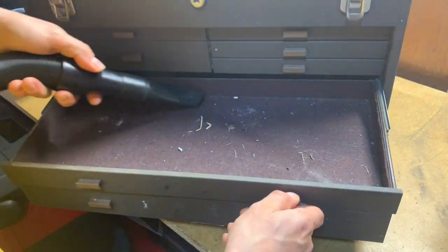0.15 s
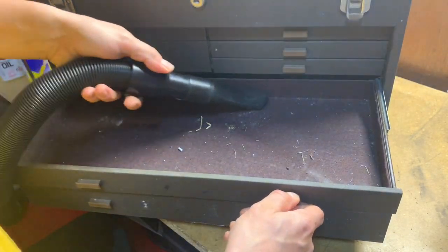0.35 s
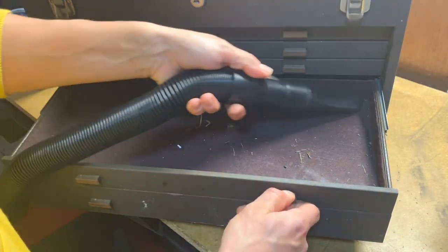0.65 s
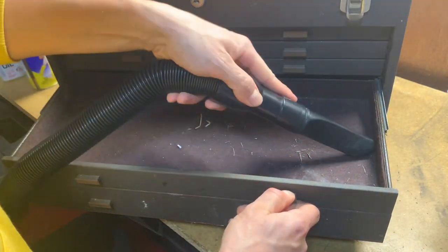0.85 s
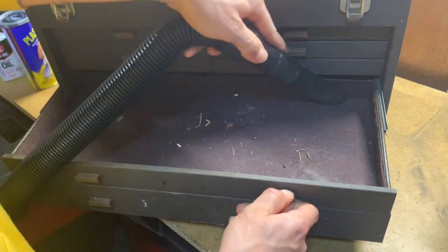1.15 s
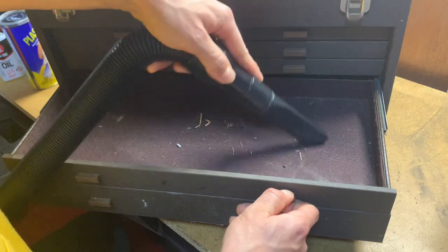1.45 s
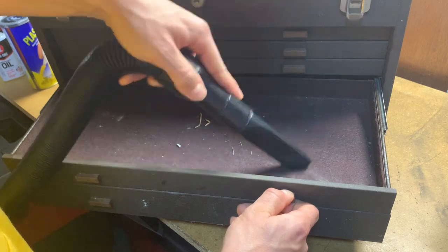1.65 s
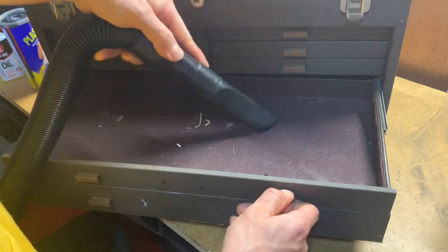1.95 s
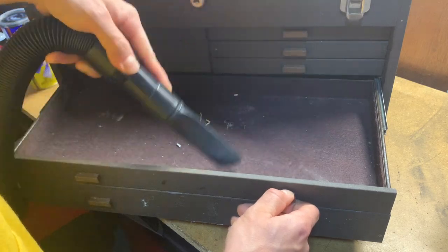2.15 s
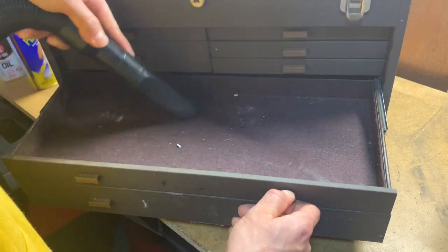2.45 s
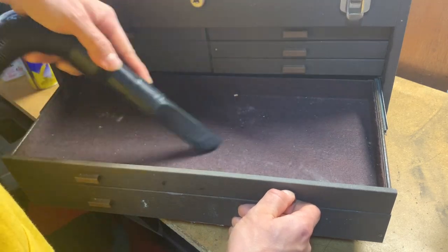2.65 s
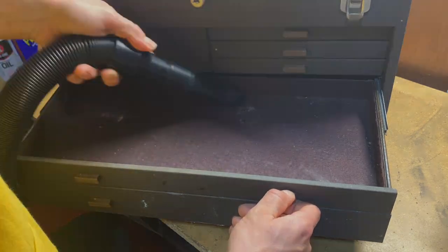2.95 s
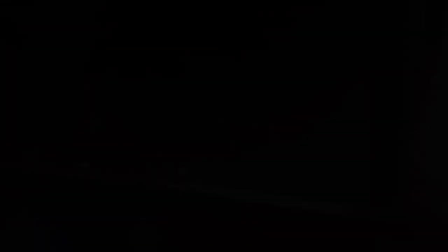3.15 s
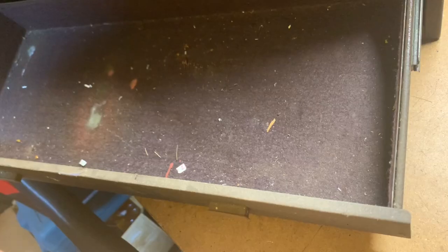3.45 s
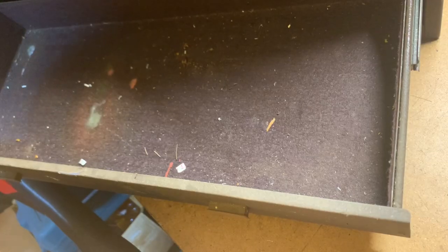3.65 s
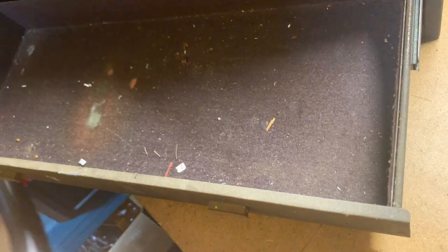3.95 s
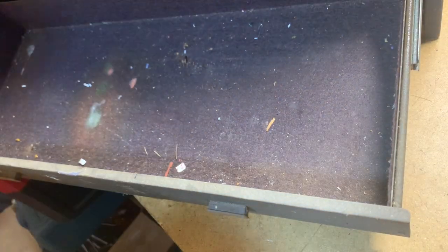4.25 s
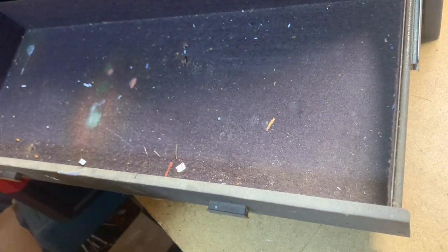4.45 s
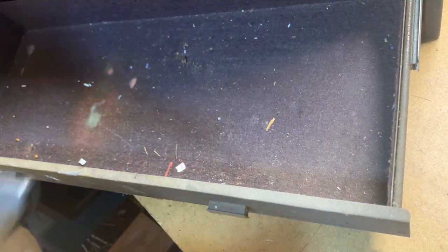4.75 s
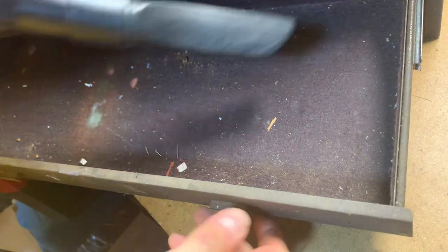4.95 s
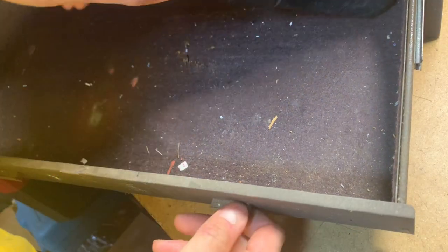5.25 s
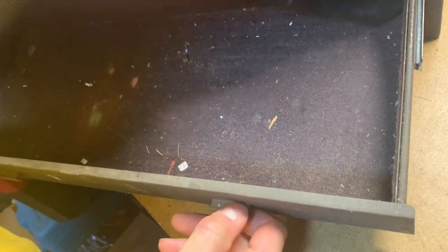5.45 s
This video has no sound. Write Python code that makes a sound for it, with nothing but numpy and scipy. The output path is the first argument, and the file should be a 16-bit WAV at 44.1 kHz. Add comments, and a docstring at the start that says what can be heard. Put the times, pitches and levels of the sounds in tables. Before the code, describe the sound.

A vacuum cleaner runs throughout, heard close in stereo in a workshop: a strong, nearly pure whine around 820 Hz, a faint, much higher fan whistle, low hose rumble and broad nozzle hiss. From 0 to 0.7 s the hiss swells and roars along the drawer's back wall. At about 0.75 s the nozzle presses onto felt; the rumble chokes briefly, the motor rises slightly, and hiss flutters in short puffs. Faint squeals come around 1.1-1.8 s. Small thuds and clacks run from 0.8 to 2.25 s, sharpest near 1.8, with another at 2.9. Suction opens after 2 s. At 3.2 s everything dips to silence for an instant, then resumes a shade lower, with fuller air roar over a second drawer. Around 4.2-4.8 s the hovering nozzle sounds hollow and tubular. A wall rush rises from 4.9 s; at 5.4 s the mouth seals, pitch jumps slightly, and rapid rasps sweep upward to the end.

```python
"""Vacuuming a tool box drawer

A vacuum cleaner whines (sine tones) in a workshop while its crevice nozzle sweeps the felt of a steel drawer.
Air rumbles in the hose and hisses at the nozzle (coloured noise). Pressed on the felt, the nozzle chokes,
the motor speeds up and the hiss swells briefly; at the back wall it roars; it bumps the drawer (ringing modes).
At 3.2 s the sound dips briefly and goes on over a second drawer, where the nozzle hovers and its tube rings."""
import sys
import numpy as np
from scipy import signal
from scipy.fft import rfft, irfft, next_fast_len
from scipy.io import wavfile
from scipy.ndimage import uniform_filter1d, map_coordinates

SR = 44100
rng = np.random.default_rng(int(sys.argv[2]) if len(sys.argv) > 2 else 0)


def waveform_to_disk(signal):
    """Save audio, clipped to [-1, 1], as 16-bit WAV at the path in sys.argv[1]."""
    frames = np.transpose(np.atleast_2d(signal))
    scaled = np.clip(frames, -1, 1) * 32767
    samples = np.round(scaled).astype(np.int16)
    wavfile.write(sys.argv[1], SR, samples)


N = 247401
T = np.arange(N) / SR  # time of each sample, s
DIP_S = 3.206  # middle of the dip between the drawers
TOP_HZ = 15750  # no sound above this
LEAVE_S = 0.036  # time to leave the back wall

# how the nozzle meets the felt: t/s, open tube ringing (0-1), mouth pressed shut (0-1)
CONTACT = [(0, 0, 0), (.68, 0.04, 0.33), (.75, 0, 0.9), (1.7, 0, 0.86), (2, 0, 0), (3.15, 0, 0.02),
           (3.3, 0.03, 0.2), (3.7, 0.07, 0.06), (4, 0, 0.5), (4.3, 0.06, 0.1), (4.48, 0.16, 0.02),
           (4.8, 0.1, 0), (4.92, 0, 0.13), (5.05, 0, 0.05), (5.36, 0.02, 0.08), (5.385, 0, 0.98),
           (5.6, 0, 0.6)]
# the nozzle runs along the back wall: start/s, end/s, closeness (0-1), approach/s
WALL_PASSES = [(-.3, .72, 0.96, 0.68), (2.87, 3.11, 0.48, 0.16), (4.95, 5.385, 0.7, 0.15)]
# whistle of the fan blades: t/s, level/dB
BLADE_TONE = [(0, -51.5), (.8, -49.5), (1.6, -50), (2.05, -53), (2.35, -53.5), (2.5, -62), (3.15, -53.5),
              (3.4, -56), (4.15, -53), (4.32, -60), (4.5, -55), (4.85, -58), (4.93, -68), (5.35, -60),
              (5.5, -54)]


def amp(db):
    """Turn decibels into gain."""
    return 10 ** (np.asarray(db) / 20)


def unit(x):
    """Scale to rms 1."""
    return x / np.sqrt(np.mean(x ** 2) + 1e-20)


def along(points, hz):
    """Read a curve of (f/Hz, value) points, joined on a log frequency axis."""
    f, v = np.transpose(points)
    return np.interp(np.log(hz + 1), np.log(f + 1), v)


def curves(rows):
    """Give one value per sample for each column after the time."""
    s, *columns = np.transpose(rows)
    return [np.interp(T, s, column) for column in columns]


def spells(rows, release_s):
    """Add up an attack, hold and release for each (start, end, strength, attack) row."""
    total = 0
    for start, end, strength, attack_s in rows:
        rise, fall = (T - start) / attack_s, (end - T) / release_s
        total = total + strength * np.clip(np.minimum(rise, fall), 0, 1)
    return total


def wobble(rate):
    """Make a smooth random curve with rate random points a second."""
    coarse = T[::16]
    knots = rng.standard_normal(int(N * rate / SR) + 4)
    return np.interp(T, coarse, map_coordinates(knots, [coarse * rate]))


def filtered(x, response):
    """Multiply the spectrum of x by a response of frequency."""
    m = next_fast_len(N + 8192)
    return irfft(rfft(x, m) * response(np.fft.rfftfreq(m, 1 / SR)), m)[..., :N]


def noise(response, channels=1):
    """Make independent noises of one colour, rms 1 together."""
    return unit(filtered(rng.standard_normal((channels, N)), response))


def above(hz, edge_hz, order=20):
    """Gain of a high-pass, steeper with higher order."""
    return np.sqrt(1 - 1 / (1 + (hz / edge_hz) ** order))


def below(hz, edge_hz, order=20):
    """Gain of a low-pass, steeper with higher order."""
    return np.sqrt(1 / (1 + (hz / edge_hz) ** order))


def resonance(hz, centre_hz, width_hz):
    """Gain of one resonance, half at width_hz from its centre."""
    return 1 / (1 + ((hz - centre_hz) / width_hz) ** 2)


def per_drawer(first, second):
    """Use one value or sound before the middle of the dip, another after it."""
    return np.where(T < DIP_S, first, second)


def blend(a, b, share):
    """Cross-fade two noises at constant power; share is the part of b."""
    return np.sqrt(1 - share) * a + np.sqrt(share) * b


def steady(x):
    """Hold the rms of several channels near 1 over time."""
    power = uniform_filter1d(np.mean(x ** 2, axis=0), size=3000)
    return x / np.sqrt(abs(power) + 1e-20)


def sliding(x, pitch):
    """Play noise channels at a moving relative pitch."""
    place = np.cumsum(pitch) % (N - 1)
    return np.array([map_coordinates(channel, [place], order=3, mode="mirror") for channel in x])


def delayed(x, ms):
    """Let x arrive later by a moving delay."""
    return map_coordinates(x, [np.arange(N) - ms * SR / 1000], order=4, mode="mirror")


def tone(phase, db, pan_db, lead):
    """Make a stereo sine of given rms; the left side leads by lead radians."""
    sides = np.array([[.5], [-.5]])
    return np.sqrt(2) * amp(db + sides * pan_db) * np.sin(phase + sides * lead)


def motor():
    """Rotor imbalance sings at the shaft rate; the fan blades whistle far above and squeal when starved of air."""
    # motor speed: t/s, shaft f/Hz
    speed = [(0.06, 818.9), (0.69, 818.0), (0.78, 822.8), (0.86, 820.2), (0.99, 819.7), (1.16, 826.4),
             (1.3, 825.6), (1.4, 823.0), (1.47, 825.2), (1.68, 826.1), (1.77, 825.4), (1.84, 821.7),
             (2.23, 818.6), (2.38, 823.0), (2.89, 820.9), (3.15, 818.4), (3.28, 811.0), (4.08, 810.6),
             (5.37, 812.6), (5.44, 821), (5.5, 823.2), (5.6, 820.5)]
    # shaft tone at the microphones: t/s, level/dB, left-right/dB
    shaft_tone = [(.06, -33, -0.5), (.27, -34, .4), (.5, -32.4, -0.5), (.85, -32.5, .8), (1.2, -33, 2),
                  (2.2, -32, 1.2), (3.15, -32, 1), (3.25, -32.5, 6), (3.92, -32, 4.5), (4.22, -35.5, 5),
                  (4.45, -35.5, 5), (4.95, -36.5, 4.5), (5.33, -35.5, 4), (5.46, -34.5, 4.5)]
    # the choked fan squeals: start/s, end/s, strength (0-1), attack/s
    squeals = [(1.115, 1.37, 1, 0.03), (1.42, 1.8, 0.87, 0.039)]
    blades = 7
    shaft_hz, = curves(speed)
    shaft_db, pan_db = curves(shaft_tone)
    blade_db, = curves(BLADE_TONE)
    # the octave of the blade tone is softer, but a squeal lifts it
    octave_db = blade_db - 8.5 + 8.5 * spells(squeals, release_s=0.031)
    turn = 2 * np.pi * np.cumsum(shaft_hz * (1 + 0.00012 * wobble(45))) / SR

    whine = tone(turn, shaft_db + 0.046 * wobble(35), pan_db, per_drawer(0.64, 0.47))
    whine += tone(2 * turn, per_drawer(-66.5, -59.5) + 2 * wobble(33), 1.9, 1.0)
    # the third harmonic sounds at the second drawer only
    whine += per_drawer(0, tone(3 * turn, -64 + 2 * wobble(15), 0.59, 0.34))
    # turbulence at the blades makes their tones flutter
    whine += tone(blades * turn, blade_db + 0.92 * wobble(16) + wobble(90), 6.4, 0.98)
    whine += tone(2 * blades * turn, octave_db + 2.0 * wobble(14) + wobble(90), 3.2, 0.43)
    return whine


def fan_hiss():
    """Turbulence between the blades smears part of the whistle into a narrow hiss."""
    centre_hz, width_hz = 5830, 190
    blade_db, = curves(BLADE_TONE)
    shared, *own = noise(lambda hz: resonance(hz, centre_hz, width_hz), channels=3)
    against_tone_db = per_drawer(-11, 1.5)
    return blend(shared, np.array(own), share=0.26) * amp(blade_db + against_tone_db + wobble(8.8))


def air():
    """The air stream rumbles in hose and canister, nearly alike at both microphones; a closed mouth muffles it."""
    # colour of the rumble at each drawer: f/Hz, level/dB
    first_air = [(25, -51), (45, -29), (80, -17), (135, -10), (210, -9), (320, -2), (430, 0.5), (530, -7),
                 (620, 2), (750, 13.5), (950, 9.5), (1080, 13), (1190, 9), (1330, -24), (1700, -94)]
    second_air = [(25, -57), (45, -47), (80, -22), (135, -11), (210, -11), (350, 3), (440, -4.5),
                  (540, 0.5), (620, -1), (730, 13), (900, 4.5), (1000, 6), (1200, -2.5), (1370, -33),
                  (1700, -41)]
    # stereo width of the rumble: f/Hz, side against mid/dB
    air_side = [(30, -6), (80, -16), (300, -15.5), (700, -11.5), (1200, -3)]
    # low body, then upper body: first drawer/dB, second drawer/dB, mouth shut/dB, back wall/dB
    rumble = [(-58.5, -53.5, 0, 1), (-47.5, -51, -5.5, 1)]
    # air roar just under the whine: t/s, level/dB
    roar_level = [(0, -56), (.68, -55), (.78, -58.5), (1.7, -55), (2.18, -49.5), (2.45, -54), (3.19, -53),
                  (3.22, -46), (3.95, -42.5), (4.3, -48.5), (4.85, -49), (5.33, -49.5), (5.42, -63)]
    # the lip seals for a moment and the rumble drops: start/s, end/s, depth (0-1), closing/s
    seals = [(.7, .81, 0.5, 0.027), (5.36, 5.7, 0.43, 0.017)]

    def part(colour, band):
        """One band of the rumble as left and right."""
        mid, side = noise(lambda hz: amp(along(colour, hz)) * band(hz), channels=2)
        side = filtered(side, lambda hz: amp(along(air_side, hz)))
        return np.array([mid + side, mid - side])

    _, shut = np.clip(curves(CONTACT), 0, 1)
    roar_db, = curves(roar_level)
    wall, sealed = spells(WALL_PASSES, LEAVE_S), spells(seals, release_s=0.025)
    low_db, high_db = [per_drawer(first_db, second_db) + shut_db * shut + wall_db * wall
                       for first_db, second_db, shut_db, wall_db in rumble]
    bands = (lambda hz: below(hz, 480),
             lambda hz: above(hz, 480) * below(hz, 800),
             lambda hz: above(hz, 860))
    low, roar, high = [per_drawer(part(first_air, band), part(second_air, band)) for band in bands]
    low = low * amp(low_db - 9 * sealed + 1.4 * wobble(19))
    high = high * amp(high_db - 15 * sealed + 1.3 * wobble(15))
    return low + roar * amp(roar_db) + high * amp([[1.8], [-1.8]])  # upper body leans left


def tube(hz):
    """The open nozzle is a tube of air with several resonances."""
    # tube resonances: f/Hz, width/Hz, level/dB
    tube_modes = [(1670, 174, -0.5), (2760, 120, -4.5), (3960, 310, -7.5), (5640, 230, -20),
                  (7570, 230, -15), (9050, 360, -10.5), (10760, 240, -14), (13000, 200, -19),
                  (14600, 400, -33)]
    return np.sqrt(sum((amp(db) * resonance(hz, centre, width)) ** 2 for centre, width, db in tube_modes))


def suction():
    """Turbulence at the nozzle mouth, stronger with more flow: one direct sound and two scattered by the steel box."""
    # colours of the hiss over each drawer, pressed on the felt, and in the wall's corner: f/Hz, level/dB
    first_drawer = [(1300, 4), (1500, 0.5), (1900, -5.5), (2500, -3.5), (3100, -0.5), (3700, 0),
                    (4500, 3.5), (5200, -2.5), (6300, -0.5), (7300, -4), (9200, -2), (10600, 0.5),
                    (13000, 6.5), (14800, 8)]
    second_drawer = [(1300, 5.5), (1550, 6.5), (2000, -1), (2450, -2.5), (3050, -2), (3600, -1.5),
                     (4900, -7.5), (5700, -8.5), (6800, -13), (7700, -5), (8400, -10), (9300, -3.5),
                     (10600, -8.5), (12200, 1), (13400, 2), (14800, 3)]
    pressed_felt = [(1300, -13), (1600, -3.5), (1850, -8), (2150, 2), (2600, 6), (3000, 4.5), (3650, 9.5),
                    (4700, 1.5), (5800, 1.5), (7300, 3), (9000, 4.5), (11200, -0.5), (12200, 5.5),
                    (13200, 5), (15500, 0)]
    wall_corner = [(1400, -6), (1650, -14), (2000, -4), (2300, -0.5), (2700, 1.5), (3150, -1.5),
                   (3700, 3.5), (4500, 3.5), (5200, -6.5), (6200, -2.5), (7000, -1.5), (9000, -1.5),
                   (12000, -2), (15000, -5.5)]
    # the tube resonances slide as the mouth nears the felt and lifts: t/s, pitch over the usual
    tube_pitch = [(3.3, 1.1), (4.1, 1.01), (4.4, 1.01), (4.6, 1.02), (4.85, 1.015), (5.1, 0.98)]
    # air speed at the mouth: t/s, flow/dB
    air_flow = [(0, -2), (.68, -4.5), (.715, 1.5), (.82, -1), (1.0, -5.5), (1.12, -9), (1.68, -9.5),
                (1.92, -3), (2.15, -2.5), (2.58, -4), (2.78, -2), (3.15, -4), (3.7, -4.5), (3.87, -0.5),
                (4.03, -1.5), (4.28, -4.5), (4.55, 0.5), (4.8, -1), (4.95, -4), (5.1, -8), (5.3, -5.5),
                (5.46, -1)]
    # lower edges of the noise bands: f/Hz
    band_edges = [1250, 2200, 5200, 10000]
    # bands from the drawer hollow up to the fizz: first drawer/dB, second drawer/dB,
    # growth (dB per dB of flow), mouth shut/dB, back wall/dB
    band_levels = [(-51.5, -47, 0.15, -9, 7), (-48, -48, 0.8, 0.5, 9), (-40.5, -39.5, 1.2, -0.5, 2.5),
                   (-45.5, -47, 1, 3.5, 0.5)]
    ringing, shut = np.clip(curves(CONTACT), 0, 1)
    flow_db, = curves(air_flow)
    wall = spells(WALL_PASSES, LEAVE_S)

    colours = (first_drawer, second_drawer, pressed_felt, wall_corner)
    first, second, pressed, corner = [noise(lambda hz: amp(along(colour, hz)), channels=3) for colour in colours]
    free = blend(per_drawer(first, second), corner, np.clip(0.73 * wall, 0, 1))
    tube_ring = sliding(noise(tube, channels=3), *curves(tube_pitch))
    hiss = blend(blend(free, pressed, shut), tube_ring, ringing)

    # the free jet flutters; with the mouth shut the lip sticks and slips, so it flutters more
    flutter_db = (1.68 + 1.1 * shut) * (0.5 * wobble(45) + 0.15 * wobble(160))
    scattered_shares = [.1, .3, .42, .42]
    upper_edges = band_edges[1:] + [TOP_HZ]
    jet = np.zeros((3, N))
    for levels, scatter, lo, hi in zip(band_levels, scattered_shares, band_edges, upper_edges):
        first_db, second_db, growth, shut_db, wall_db = levels
        band = filtered(hiss, lambda hz: above(hz, lo) * (below(hz, hi) if hi < TOP_HZ else hz < hi))
        level_db = per_drawer(first_db, second_db) + growth * flow_db + shut_db * shut + wall_db * wall
        level = np.sqrt(amp(level_db) ** 2 + swell_power(np.sqrt(lo * hi)))
        scattered = scatter * (1 - ringing)  # lifted clear, the nozzle is heard more directly
        paths = np.sqrt([1 - scattered, scattered, scattered])
        jet += paths * level * amp(flutter_db + 1.08 * wobble(13)) * steady(band)
    return jet


def nozzle(centred_hz=13000):
    """The moving nozzle reaches the two microphones at different times."""
    # nozzle place: t/s, how much later the left microphone hears it/ms
    mic_lag = [(0, -0.082), (.65, -0.025), (1.7, -0.039), (2.55, -0.093), (3.1, -0.048), (3.8, -0.038),
               (4.15, -0.17), (4.5, -0.19), (4.9, -0.16), (5.15, -0.045)]
    direct, *scattered = suction()
    lag_ms, = curves(mic_lag)
    top = filtered(direct, lambda hz: above(hz, centred_hz, order=90) ** 2)  # the highest fizz stays in the centre
    moving = np.array([delayed(direct - top, side * lag_ms) for side in (.5, -.5)])
    heard = moving + top + scattered
    # the two microphone ports differ in colour: f/Hz, left-right/dB
    ports = [(1400, 3.5), (2600, 0.5), (4300, 2.0), (8000, 0.5), (12000, -3.5), (15000, 1.5)]
    return filtered(heard, lambda hz: amp(np.array([[.5], [-.5]]) * along(ports, hz)))


def drifting(x, depth_db):
    """Reflections in the steel drawer form peaks and notches that shift as the nozzle moves."""
    z = signal.stft(x, nperseg=1024)[2]
    field = rng.standard_normal(z.shape[-2:])  # random over frequency and time, then smoothed
    for _ in range(2):
        field = uniform_filter1d(uniform_filter1d(field, size=5, axis=0), size=13, axis=1)
    field = field - uniform_filter1d(field, size=41, axis=0)  # the overall tilt stays
    hz = np.fft.rfftfreq(1024, 1 / SR)[:, None]
    gain = amp(depth_db * unit(field) * above(hz, 2000, order=4))  # short waves interfere most
    return signal.istft(z * unit(gain), nperseg=1024)[1][..., :N]


def moving_band(x):
    """A narrow band of the nozzle noise is weakened or lifted, and its pitch slides over time."""
    # the narrow band: t/s, f/Hz, gain/dB (negative weakens)
    band_path = [(0, 5140, 2), (.35, 5300, 0), (.65, 5600, 3), (.8, 4900, -6), (1.7, 4970, 4),
                 (2.5, 4970, -6), (3.17, 5200, -16), (3.24, 3120, -16), (3.8, 2950, -21), (4.2, 3450, 0),
                 (4.55, 3270, -2), (4.85, 3320, -8), (5.0, 3300, -5), (5.3, 3400, 6)]
    half_width_octaves = 0.042
    hz, t, z = signal.stft(x, SR, nperseg=512)
    s, centre_hz, gain_db = np.transpose(band_path)
    octaves = np.log2((hz[:, None] + 1) / np.interp(t, s, centre_hz))
    gain = amp(np.interp(t, s, gain_db) * np.exp(-(octaves / half_width_octaves) ** 2))
    return signal.istft(z * gain, nperseg=512)[1][..., :N]


def sweeps(rows, width, flutter_db):
    """Air resonates in a gap that narrows, so each fluttering burst sweeps upward; width is relative to pitch."""
    base_hz = 4000  # the noise is made here, then played at a moving pitch
    pitch, level = np.ones(N), np.zeros(N)
    for start, length, db, from_hz, to_hz in rows:
        during = (T >= start) & (T < start + length)
        progress = (T[during] - start) / length
        pitch[during] = from_hz / base_hz * (to_hz / from_hz) ** progress
        level[during] = amp(db) * np.sqrt(abs(np.sin(np.pi * progress)))
    rush = noise(lambda hz: resonance(hz, base_hz, width * base_hz) * above(hz, base_hz / 2, order=8), channels=3)
    shared, *own = sliding(rush, pitch)
    return blend(shared, np.array(own), share=0.28) * level * amp(flutter_db * wobble(170))


def gap_rushes():
    """Air resonates between the nozzle and the wall."""
    # rushes: start/s, length/s, level/dB, start f/Hz, end f/Hz
    rushes = [(.33, .41, -45, 2446, 2803), (3.11, .1, -42, 1150, 1298), (4.92, 0.43, -44, 1250, 1575)]
    return sweeps(rushes, width=0.18, flutter_db=1.1)


def bumps(rebound_s=0.0205, rebound_db=-13):
    """Plastic meets felt-damped steel: a short thud and its rebound, with a clack on harder contact."""
    # bumps: t/s, level/dB, clack against thud/dB, strongest clack f/Hz, strongest thud f/Hz
    knocks = [(.365, -62, -21, 1200, 410), (.555, -47, -15, 1200, 440), (0.814, -41, -6, 1150, 420),
              (1.082, -42, -9, 1200, 430), (1.276, -51, -12, 1200, 430), (1.379, -41.5, -12, 1200, 250),
              (1.464, -45, -1, 1100, 430), (1.646, -45.5, -12, 1200, 400), (1.833, -35.5, 6, 2200, 440),
              (2.012, -44, -8, 1200, 410), (2.07, -45, -16, 1200, 440), (2.155, -50, 9, 1400, 530),
              (2.241, -36, -12, 1200, 480), (2.923, -37, 3.5, 1250, 490)]
    # drawer modes: f/Hz, level/dB, time to fall by 60 dB/s
    drawer_modes = [(150, 1, 0.096), (300, -1, 0.086), (432, 6.5, 0.1), (510, 5, 0.07), (1113, 9.5, 0.047),
                    (1237, 8, 0.035), (1390, -5, 0.04), (1980, 0, 0.063), (2750, -1, 0.063)]
    crack_db, crack_t60_s = -6, 0.0054  # the tick of hard contact, level against the clack
    out, t = np.zeros(N + SR), np.arange(SR // 3) / SR
    for s, db, clack_db, clack_hz, thud_hz in knocks:
        # both fall away from their strongest pitch, in dB per octave
        thud = lambda hz: -7.5 * abs(np.log2(hz / thud_hz))
        clack = lambda hz: clack_db - 7 * abs(np.log2(hz / clack_hz))
        modes = [(hz, level + (clack(hz) if hz > 800 else thud(hz)), t60) for hz, level, t60 in drawer_modes]
        for late_s, soft_db in ((0, 0), (rebound_s, rebound_db)):
            ring = 0
            for hz, level, t60 in modes:
                mode_hz = hz * rng.normal(1, 0.0048)  # each hit is tuned slightly differently
                ring = ring + amp(level - 60 * t / t60) * np.sin(2 * np.pi * mode_hz * t)
            crack = amp(crack_db + clack_db - 60 * t / crack_t60_s) * rng.standard_normal(len(t))
            hit = ring * (1 - np.exp(-t / 0.0009)) + crack  # the ring starts softly
            out[round((s + late_s) * SR):][:len(t)] += amp(db + soft_db - 5.5) * hit
    return filtered(out[:N], lambda hz: above(hz, 93, order=6))  # the knocks carry no deep bass


def swell_power(hz):
    """Short puffs and longer swells of hiss rise and fade like a bell; gives their power near one frequency."""
    # puffs and swells of hiss: middle t/s, length/s, level/dB, f/Hz
    hiss_swells = [(0.86, .03, -42.5, 8500), (0.913, 0.058, -53, 3720), (1.047, 0.016, -47.5, 9000),
                   (1.16, 0.043, -49, 3300), (1.238, 0.053, -49, 3340), (1.363, 0.049, -45.5, 6300),
                   (1.443, 0.033, -45, 8400), (1.576, 0.098, -50, 3100), (1.745, 0.053, -45.5, 9000),
                   (1.818, 0.025, -43.5, 8000), (1.89, 0.031, -47.5, 7000), (2.112, 0.045, -47, 11000),
                   (2.726, 0.034, -46, 8970), (3.028, 0.18, -43.5, 4250), (3.13, 0.089, -46.5, 1896),
                   (4.013, 0.099, -52, 6400), (4.63, 0.35, -63, 8800), (4.176, 0.63, -44, 1750),
                   (5.33, 0.45, -49, 12000)]
    spread_octaves = 0.97
    power = 0
    for s, length_s, db, pitch_hz in hiss_swells:
        octaves = np.log2(hz / pitch_hz) / spread_octaves
        power = power + amp(db) ** 2 * np.exp(-octaves ** 2 - (2 * (T - s) / length_s) ** 2)
    return power


def rasps():
    """Air rasps under the lip as it drags, each rasp rising in pitch."""
    # rasps: start/s, length/s, level/dB, start f/Hz, end f/Hz
    lip_rasps = [(0.896, 0.079, -48, 2900, 3390), (1.868, 0.056, -56, 3500, 4000),
                 (1.973, 0.027, -54, 1500, 2600), (5.451, 0.024, -41, 3700, 4600),
                 (5.468, 0.038, -43, 4060, 6320), (5.505, 0.044, -40, 2985, 6500),
                 (5.558, 0.0285, -43, 3170, 3650), (5.587, 0.021, -45, 2800, 4000)]
    return sweeps(lip_rasps, width=0.2, flutter_db=4)


def scene():
    """Motor, air stream, nozzle and drawer sound together."""
    mouth = moving_band(drifting(nozzle(), depth_db=2.0))
    return motor() + fan_hiss() + air() + mouth + gap_rushes() + bumps() + rasps()


def record(dry):
    """The level dips briefly to silence; nothing is kept above the band limit."""
    dip = np.clip((abs(T - DIP_S) - .002) / 0.029, 0, 1)
    return filtered(dry * dip, lambda hz: hz < TOP_HZ)


dry = scene()
out = record(dry)
waveform_to_disk(out)
```